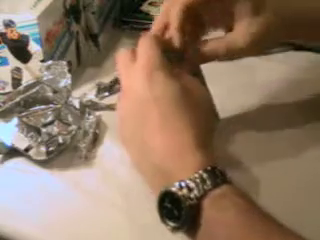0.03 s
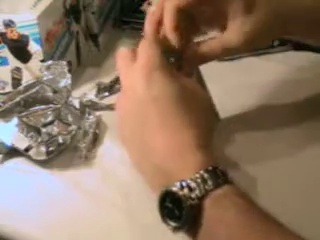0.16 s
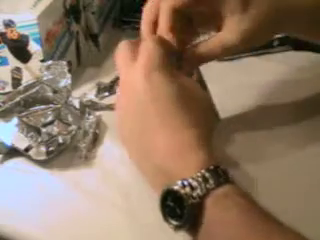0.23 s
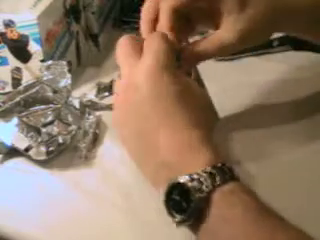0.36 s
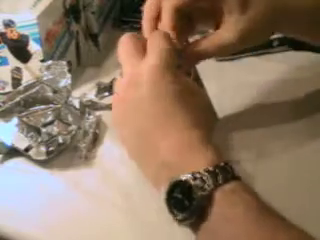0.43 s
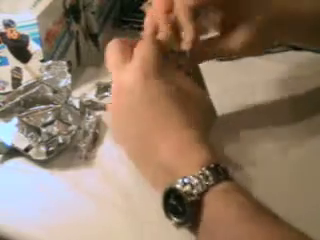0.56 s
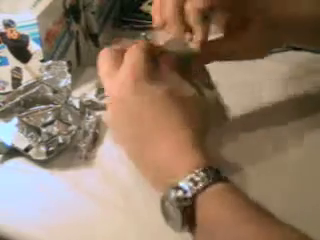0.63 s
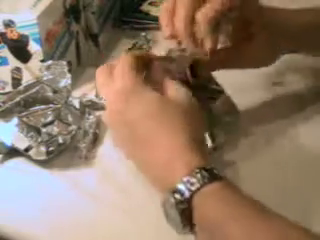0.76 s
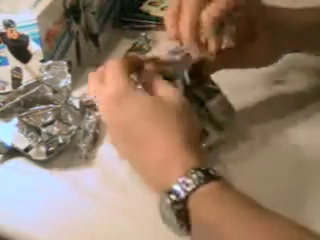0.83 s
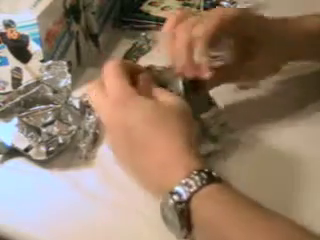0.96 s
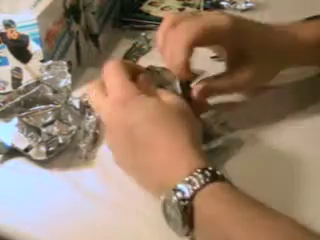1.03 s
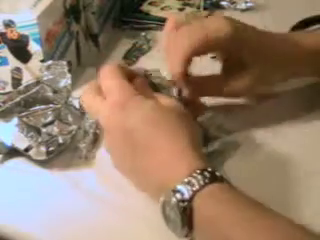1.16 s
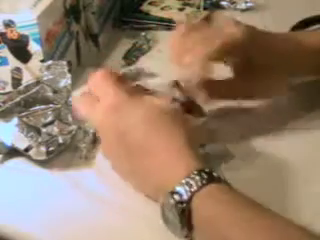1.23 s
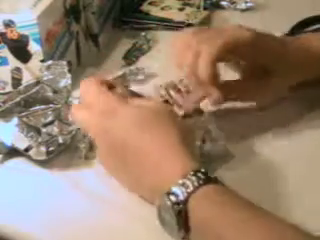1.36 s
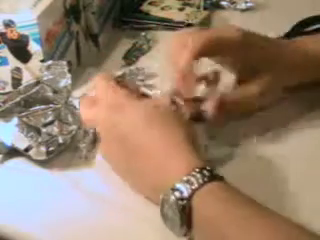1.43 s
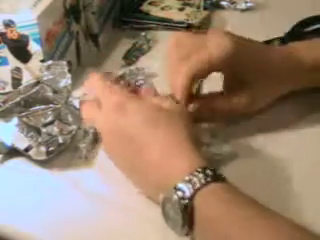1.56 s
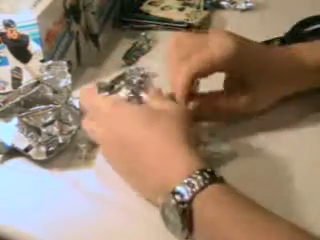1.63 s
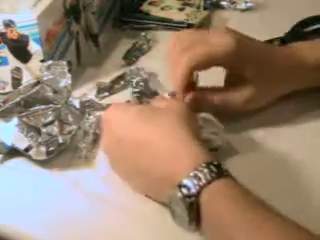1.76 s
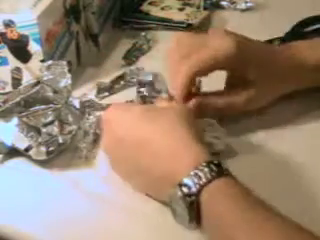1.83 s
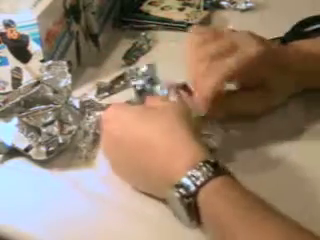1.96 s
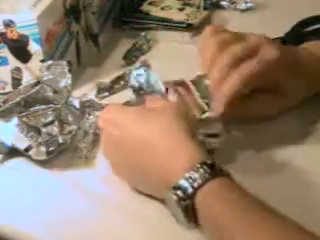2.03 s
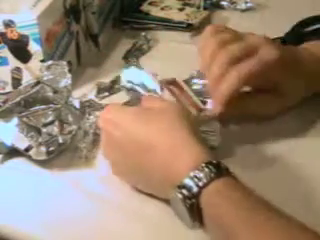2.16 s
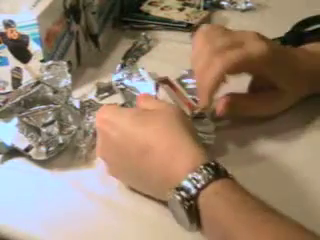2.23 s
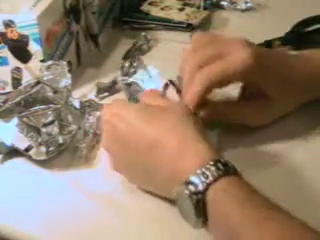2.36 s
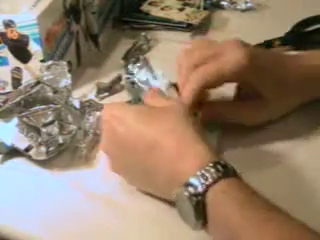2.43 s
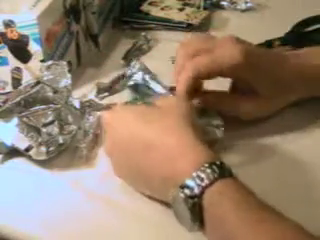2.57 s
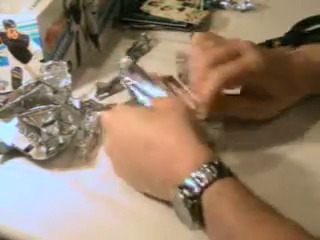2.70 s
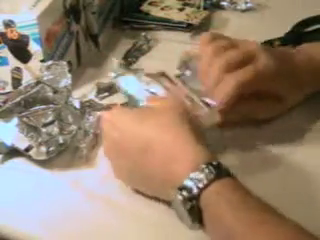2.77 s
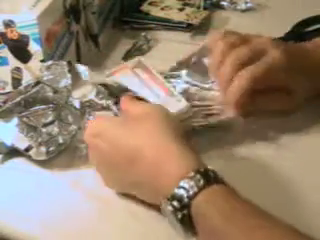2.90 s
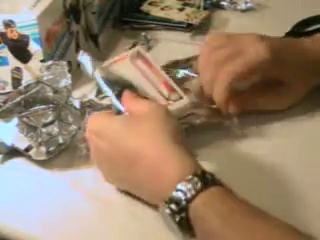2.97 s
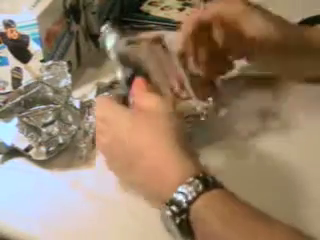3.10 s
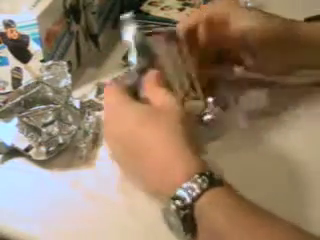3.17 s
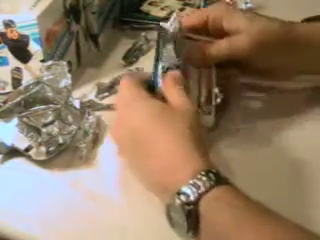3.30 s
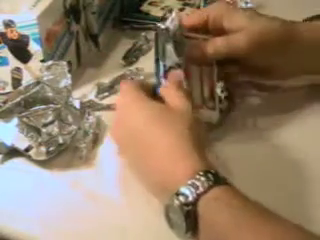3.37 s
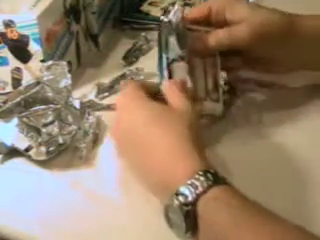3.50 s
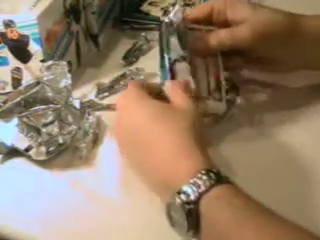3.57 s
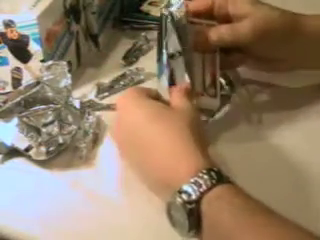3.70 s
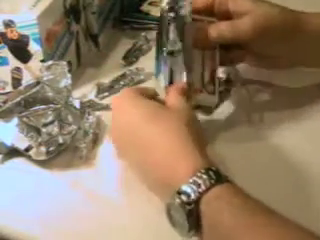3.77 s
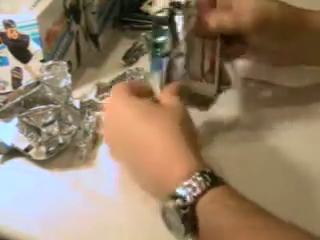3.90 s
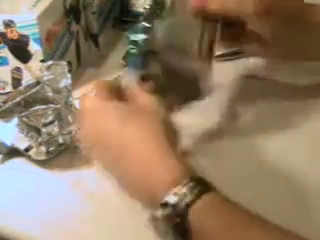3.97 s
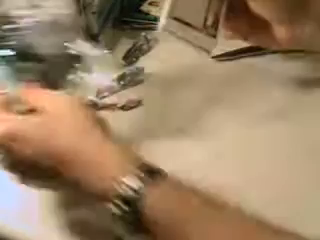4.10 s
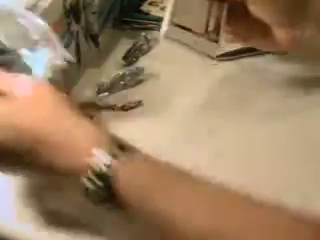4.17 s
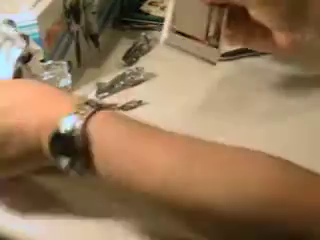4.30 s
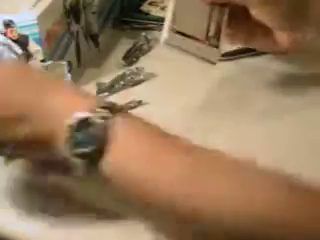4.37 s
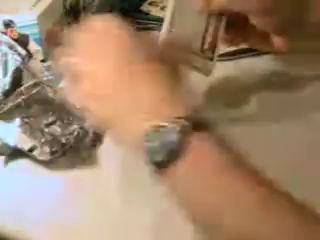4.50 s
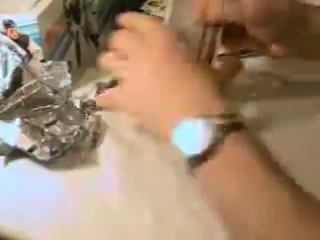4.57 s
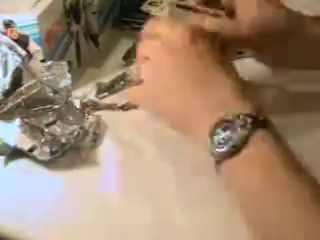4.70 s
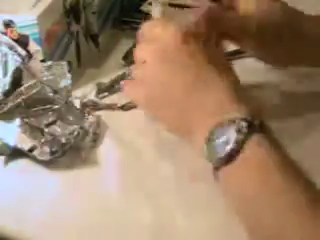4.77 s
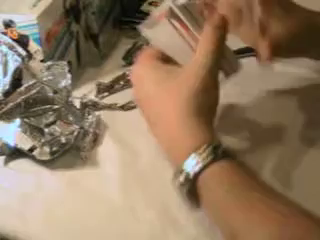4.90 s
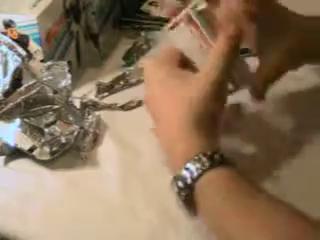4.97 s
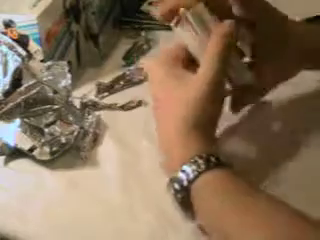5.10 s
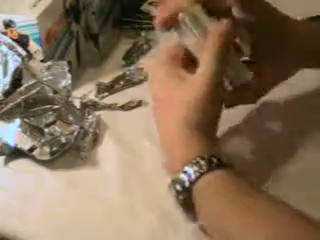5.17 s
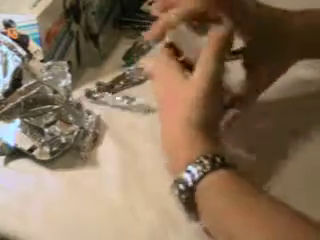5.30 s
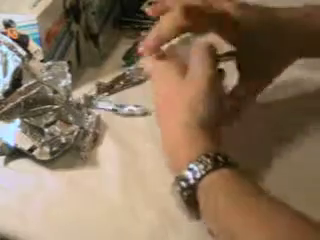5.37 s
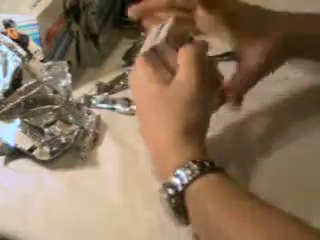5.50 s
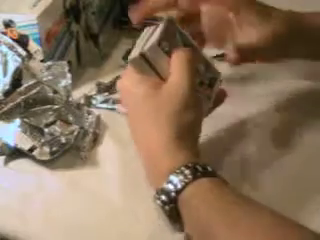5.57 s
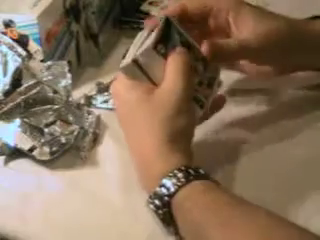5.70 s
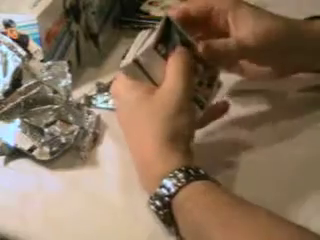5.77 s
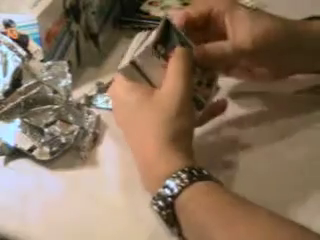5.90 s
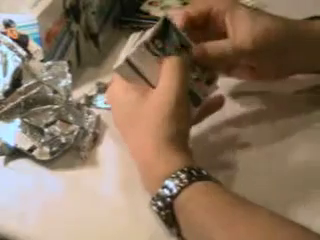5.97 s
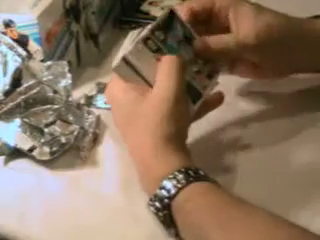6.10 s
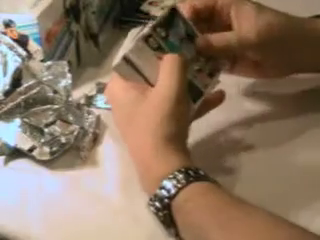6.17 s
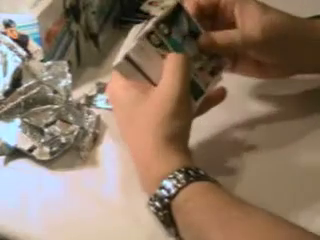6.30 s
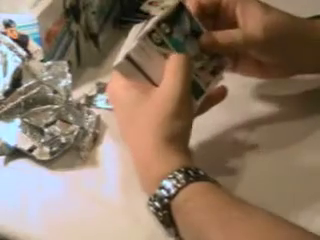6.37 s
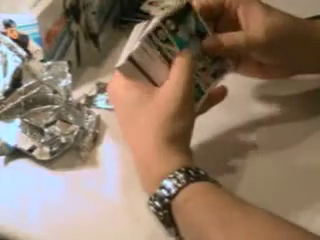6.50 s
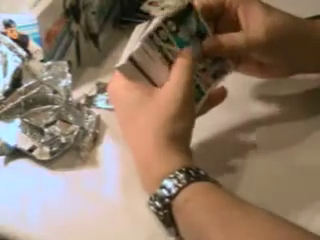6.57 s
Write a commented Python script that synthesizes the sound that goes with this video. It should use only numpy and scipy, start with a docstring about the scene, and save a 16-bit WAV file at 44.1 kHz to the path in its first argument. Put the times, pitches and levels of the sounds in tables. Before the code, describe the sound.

A foil wrapper crackles irregularly, faint at first, then much louder, with dry snaps and two short zipping tears before a last heavy crunch pops it open. Smaller crinkles and hollow low knocks follow until just past four seconds. The rest is nearly quiet: a few light cardboard ticks, grainy finger rubbing, soft room hiss with faint hum. Close, indoor pickup with a short room tail and dull top end.

```python
"""Two hands squeeze a foil pack on a table in a small room, over faint steady tones and soft room noise.
Creases snap as sharp ringing pulses over swarms of tiny crinkles; the seam rips in trains of quick slips.
Three hard pulls swell the crinkle; around the last, the pack pops open with one short pulse of air.
Bumps of the cardboard box, bursts of low resonant noise, run through the tearing until the foil dies down.
Then the box ticks and brushes against the fingers in grainy hiss, and two more high tones fade in late on."""
import sys
import numpy as np
from scipy import signal
from scipy.fft import rfft, irfft, next_fast_len
from scipy.io import wavfile
from scipy.ndimage import uniform_filter1d, map_coordinates

SR = 44100
rng = np.random.default_rng(int(sys.argv[2]) if len(sys.argv) > 2 else 0)


def bounce(signal):
    """Save signal as a 16-bit WAV file at the path given by the first command-line argument."""
    frames = np.transpose(np.atleast_2d(signal))
    limited = np.clip(frames, -1, 1)
    pcm = np.round(limited * 32767).astype(np.int16)
    wavfile.write(sys.argv[1], SR, pcm)


N = 292819
T = np.arange(N) / SR  # time [s]


def amp(db):
    """Decibels to gain."""
    return 10 ** (np.asarray(db) / 20)


def unit(x):
    """x at rms 1."""
    return x / np.sqrt(np.mean(x ** 2) + 1e-20)


def along(points, hz):
    """Read (frequency [Hz], value) points at hz, on a log frequency axis."""
    f, v = np.transpose(points)
    return np.interp(np.log(hz + 1), np.log(f + 1), v)


def filtered(x, response):
    """x shaped by a gain over frequency, without phase shift."""
    m = next_fast_len(N + SR // 2)
    return irfft(rfft(x, m) * response(np.fft.rfftfreq(m, 1 / SR)), m)[:N]


def coloured_noise(points):
    """Noise at rms 1 with a spectrum of (frequency [Hz], level [dB]) points."""
    return unit(filtered(rng.standard_normal(N), lambda f: amp(along(points, f))))


def pulse(gain, size=1024):
    """The minimum-phase pulse with this gain over frequency, made by folding its cepstrum."""
    hz = np.fft.rfftfreq(size, 1 / SR)
    cepstrum = irfft(np.log(np.maximum(gain(hz), 1e-6)))
    cepstrum[1:size // 2] *= 2
    cepstrum[size // 2 + 1:] = 0
    return irfft(np.exp(rfft(cepstrum)))


def hump(f, hz, spread, skirt=1.0):
    """A broad resonance around hz; spread in octaves, a higher skirt falls off faster far out."""
    return (1 + (np.log2((f + 1) / hz) / spread) ** 2 / (4 * skirt)) ** -skirt


def add(track, s, x):
    """Mix x into the track at time s."""
    part = track[max(round(s * SR), 0):][:len(x)]
    part += x[:len(part)]


def wobble(rate):
    """A smooth random curve with rate knots a second."""
    return map_coordinates(rng.standard_normal(N // 100), [T * rate], mode="wrap")


def swell(middle_s, length_s):
    """A smooth rise and fall, half a cosine cycle long."""
    return np.cos(np.pi * np.clip((T - middle_s) / length_s, -.5, .5))


def stroke_db(start_s, hold_s, rise, fall):
    """Attack, hold and release of one hand movement; rise and fall in dB per s."""
    attack = -rise * np.maximum(start_s - T, 0)
    release = -fall * np.maximum(T - start_s - hold_s, 0)
    return attack + release


def handling():
    """The powers of all hand movements add up; the strongest weighs most in the brightness."""
    # fingers squeezing the foil: (start [s], hold [s], crinkle level [dB], treble over body [dB])
    squeezes = [(0.0, .34, -56.5, 4), (0.534, 0.022, -46, -9.5), (0.621, .07, -44.5, 0),
                (0.768, .095, -43, -2.5), (0.996, 0.11, -49, 2), (1.109, 0.049, -42, -1),
                (1.189, .05, -39, 0.5), (1.392, 0.072, -45.5, -1), (1.529, .06, -40.5, 0.5),
                (1.705, 0.097, -50.5, 1), (1.843, 0.022, -43, 3.5), (1.94, 0.034, -42, -4.5),
                (2.254, 0.016, -41.5, -1.5), (2.34, .1, -46, -4.5), (2.458, 0.25, -42, -3),
                (2.686, .08, -37, -4), (2.975, .075, -43, 2), (3.157, 0.27, -54, -7),
                (3.692, 0.37, -52, -1.5), (3.963, 0.033, -40, 0), (4.176, .075, -56.5, -1.5),
                (4.346, 0.025, -47.5, -9)]
    # hard pulls that force the pack open:
    # (start [s], hold [s], crinkle level [dB], treble over body [dB], build-up [dB/s])
    pulls = [(1.281, 0.029, -27, 5.5, 597), (1.979, 0.032, -26, 14, 1296), (2.833, 0.026, -25.5, -1, 170.5)]
    # foil merely held, faintly crinkling: (start [s], hold [s], crinkle level [dB], treble over body [dB])
    holding = (0, 3.5, -60.5, -1.5)
    grip, settle = 1399, 231.5  # [dB/s] a squeeze takes hold at once; the foil then settles
    let_go = 254  # [dB/s] the strain drops once the foil has given way
    moves = [(*row, grip, settle) for row in [holding, *squeezes]]
    moves += [(*row, let_go) for row in pulls]
    power, bright = np.full(N, 1e-12), np.zeros(N)
    for s, hold_s, db, treble_db, rise, fall in moves:
        level_db = db + stroke_db(s, hold_s, rise, fall)
        share = amp(np.maximum(level_db, -200)) ** 2
        power += share
        bright += treble_db * share
    return 10 * np.log10(power), bright / power


def bass_cut(f, hz, corner=0.26):
    """A facet that rings at hz radiates little far below it."""
    return 1 / np.sqrt(1 + (corner * hz / (f + 1)) ** 4)


def facet_colour(f, hz, spread):
    """What the microphone takes in of one ringing facet: resonance, bass cut and soft treble."""
    # microphone response to the facets, falling steeply in the treble: (frequency [Hz], gain [dB])
    microphone = [(100, 14.5), (5000, 1), (6300, -1.5), (7500, -15), (8700, -35.5)]
    ring = hump(f, hz, spread, skirt=1.4)
    return ring * bass_cut(f, hz) * amp(along(microphone, f))


def buckle(gain, flutter, settle_s):
    """A facet flips over with one sharp pulse, then flutters for a few ms; energy 1, random sign."""
    flip = pulse(gain)
    t = T[:len(flip)]
    onset = 1 - np.exp(-(2 * t / settle_s) ** 2)
    shiver = rng.standard_normal(len(flip)) * np.exp(-t / settle_s) * onset
    after = signal.fftconvolve(flip, shiver)[:len(flip)]
    x = flip / np.linalg.norm(flip) + flutter * after / np.linalg.norm(after)
    return rng.choice([-1, 1]) * x / np.linalg.norm(x)


def snaps(rows, flutter, settle_s):
    """Facets buckle singly, big ones low and small ones high: (s, dB over 3 ms, Hz, octaves)."""
    out = np.zeros(N)
    span = np.sqrt(.003 * SR)  # turns energy 1 into rms 1 over 3 ms
    for s, db, hz, spread in rows:
        snap = buckle(lambda f: facet_colour(f, hz, spread), flutter, settle_s)
        add(out, s, amp(db) * span * snap)
    return out


def stray_creases(work_db, over_db=9, size_db=2.5, ceiling_db=-35, pitch_hz=2300, scatter=0.41, count=120):
    """Lesser creases give way at random moments, set against the work of the hands: (s, dB, Hz)."""
    moments = rng.integers(N, size=count)
    rows = []
    for at, (size, pitch) in zip(moments, rng.standard_normal((count, 2))):
        db = min(work_db[at] + over_db + size_db * size, ceiling_db)
        rows.append((T[at], db, pitch_hz * 2 ** (scatter * pitch)))
    return rows


def foil_snaps(work_db):
    """Loud and lesser creases of the foil give way; some ring clearly, some crack dryly."""
    # the loudest creases: (time [s], level over 3 ms [dB], pitch [Hz])
    loud_creases = [(0.0793, -45, 3850), (0.133, -39, 2990), (0.1939, -36, 2540), (0.2449, -32.5, 2140),
                    (0.3115, -38, 2150), (0.335, -35, 1770), (0.4566, -34.5, 1900), (0.5218, -31.5, 1420),
                    (0.607, -33.5, 1390), (0.6238, -30, 1700), (0.6474, -31, 2140), (0.6571, -27.5, 2500),
                    (0.6873, -30, 3170), (0.6979, -25, 3500), (0.771, -33.5, 1730), (0.8631, -21.5, 2470),
                    (0.9893, -34.5, 1237), (1.0504, -28, 1530), (1.1545, -32, 2450), (1.2521, -35, 2010),
                    (1.278, -28, 2820), (1.2981, -19, 1720), (1.4457, -32, 2240), (1.525, -30.5, 1780),
                    (1.5586, -25, 1298), (1.5685, -30.5, 1964), (1.7746, -36.5, 2590), (1.945, -32.5, 2970),
                    (1.9686, -28.5, 2560), (2.2585, -35, 1520), (2.3402, -32.5, 1940), (2.4499, -35, 1510),
                    (2.4821, -25.5, 1037), (2.5765, -30, 2424), (2.6058, -28, 1960), (2.6984, -22.5, 2390),
                    (2.7134, -26.5, 1620), (2.7661, -25, 1955), (2.7926, -15.5, 1580),
                    (2.8012, -23.5, 2170), (2.8448, -17, 2224), (2.872, -20.5, 1860), (3.0256, -35, 1540),
                    (3.2151, -45, 2900), (3.3908, -30, 1740), (3.4579, -36, 2110), (3.7389, -37, 1950),
                    (3.7773, -37.5, 3610), (3.8095, -29.5, 2160), (3.8216, -32, 2000), (3.8618, -38, 2030),
                    (3.9284, -31, 2300), (4.1738, -41, 2100), (4.2502, -39.5, 1290)]
    spread, spread_scatter = 0.4, 0.28  # width of the ring [octaves], its scatter [natural log]
    creases = [(*row, spread * np.exp(spread_scatter * rng.standard_normal()))
               for row in [*loud_creases, *stray_creases(work_db)]]
    return snaps(creases, flutter=.95, settle_s=.0013)


def crinkle(work_db, bright_db, rest_rate=270, rate_db=0.56, size_db=6.5, clump_db=-1.0, clump_rate=190,
            slide_db=-15, slack_db=12, pitch_hz=2200, scatter=0.55, spread=0.33, split_hz=2200, count=96):
    """Swarms of tiny creases: harder work makes them louder and denser."""
    # colour of the whole foil sheet: (frequency [Hz], relative level [dB per Hz])
    foil_colour = [(71, -48.5), (120, -35), (318, -6.5), (374, -9.5), (472, -2.5), (1040, 0.5), (1340, 2.5),
                   (2260, -3.5), (2810, -2), (5380, -9), (6920, -25), (8910, -56.5), (11600, -82),
                   (19600, -120)]
    rate = rest_rate * amp(rate_db * (work_db - np.median(work_db)))  # creases per s
    chance, sizes, facet = rng.random(N), rng.standard_normal(N), rng.integers(count, size=N)
    pitches = pitch_hz * 2 ** (scatter * rng.standard_normal(count))
    facets = [buckle(lambda f: hump(f, hz, spread), flutter=0.98, settle_s=0.0011) for hz in pitches]
    swarm = np.zeros(N)
    for i in np.flatnonzero(chance < rate / SR):
        add(swarm, T[i], amp(size_db * min(sizes[i], 2)) * facets[facet[i]])
    # under a firm grip one crease sets off its neighbours, in clumps of a few ms
    grip = np.clip(1 + (work_db - work_db.max()) / 40, 0, 1)
    swarm *= amp(2 * clump_db * grip * np.tanh(wobble(clump_rate)))
    # all facets together take on the colour of the whole sheet
    mean_gain = np.sqrt(np.mean(np.abs(rfft(np.array(facets))) ** 2, axis=0))
    sheet = pulse(lambda f: amp(along(foil_colour, f)) / mean_gain)
    swarm = unit(signal.fftconvolve(swarm, sheet)[:N])
    # under a light grip the layers also slide over each other, with a fine hiss
    swarm += amp(slide_db + slack_db * (1 - grip)) * coloured_noise(foil_colour)
    # taut foil is brighter than slack foil
    body = filtered(swarm, lambda f: 1 / (1 + (f / split_hz) ** 4))
    treble = swarm - body
    tilt = amp(bright_db / 2)
    swarm = unit(body / tilt + treble * tilt)
    # the creases share out the work of the hands: level evened over 1500 samples, gaps left quiet
    power = np.abs(uniform_filter1d(swarm ** 2, size=1500))
    return amp(work_db) * swarm / np.sqrt(power + 0.017)


def tears(slip_rate=650, jitter=0.38, size_db=3.5, count=80):
    """The tear advances in quick uneven slips; each one rings the taut strip of foil."""
    # rips along the seam: (middle [s], length [s], nominal level [dB], ring [Hz], spread [octaves])
    rips = [(0.828, 0.096, -40, 3100, 0.48), (1.28, 0.017, -26, 2620, 0.13),
            (1.304, 0.074, -32.5, 2010, 0.61), (1.992, 0.059, -27, 2990, 0.46),
            (2.022, 0.062, -29.5, 2410, 0.36)]
    out = np.zeros(N)
    for middle_s, length_s, db, hz, spread in rips:
        slips = np.zeros(N)
        gaps_s = np.exp(jitter * rng.standard_normal(count)) / slip_rate
        for s in middle_s - length_s / 2 + np.cumsum(gaps_s):
            slip = buckle(lambda f: facet_colour(f, hz, spread), flutter=0.3, settle_s=0.0022)
            add(slips, s, amp(size_db * rng.standard_normal()) * slip)
        density = np.sqrt(SR / slip_rate)  # brings the train of slips to about rms 1
        out += amp(db) * swell(middle_s, length_s) * slips * density
    return out


def puff(start_s=2.7925, db=-32, length_s=0.00069):
    """The pack pops open and pushes out one short puff of air: a one-sided pulse, db at its peak."""
    u = np.maximum(T - start_s, 0) / (length_s / 2)
    return amp(db) * u * np.exp(1 - u)


def box_ticks():
    """The cardboard box ticks in the fingers, each tick a small panel buckling."""
    # ticks: (time [s], level over 3 ms [dB], pitch [Hz], spread [octaves])
    tick_rows = [(4.5871, -39, 1110, 0.75), (4.735, -52, 2600, 0.56), (4.9157, -47, 2150, 0.55),
                 (5.183, -61, 4200, 0.4), (5.2691, -50, 2830, 0.74), (5.2769, -34.5, 1850, 0.95),
                 (5.528, -57, 4500, 0.5), (5.5682, -38.5, 2200, 0.17), (6.0166, -53, 1594, 0.35)]
    return snaps(tick_rows, flutter=.85, settle_s=.001)


def bumps(spread=0.38, rise_s=0.0016):
    """The hollow box answers soft contacts with a short low rumble."""
    # dull bumps of box and fingers: (time [s], level before rise and decay [dB], pitch [Hz], t60 [s])
    contacts = [(.573, -44.5, 430, 0.16), (1.194, -29, 480, 0.044), (1.293, -52, 426, 0.014),
                (1.446, -45.5, 224, 0.12), (1.559, -38, 380, 0.046), (2.262, -40.5, 462, 0.043),
                (2.705, -37, 390, 0.075), (2.832, -29, 414, 0.034), (2.897, -28, 437, 0.045),
                (3.822, -44, 288, 0.1), (4.006, -46.5, 280, 0.13), (4.349, -41, 298, 0.091),
                (4.367, -40, 597, 0.062)]
    out, t = np.zeros(N), T[:SR // 4]
    for s, db, hz, t60 in contacts:
        scuff = rng.standard_normal(len(t)) * amp(-60 * t / t60) * (1 - np.exp(-t / rise_s))
        cavity = pulse(lambda f: hump(f, hz, spread, skirt=2.9), size=4096)
        ring = signal.fftconvolve(scuff, cavity)
        add(out, s, amp(db) * ring * np.linalg.norm(scuff) / np.linalg.norm(ring))
    return out


def rubs(grip_db=3, grip_rate=45, grain_db=6):
    """Skin brushes over card: a fine grainy hiss that wavers with the grip."""
    # fingers sliding on the cardboard: (middle [s], length [s], level at the middle [dB])
    strokes = [(3.59, 0.9, -66), (4.727, 0.14, -61), (5.16, 0.4, -65.5), (5.471, 0.31, -63.5),
               (5.713, 0.22, -64), (6.529, 0.12, -66)]
    # colour of the rubbed cardboard: (frequency [Hz], relative level [dB per Hz])
    cardboard = [(150, 3), (600, 1.5), (2000, 0.5), (5000, -5.5), (7000, -24.5), (9000, -57)]
    grain_level_db = grain_db * rng.standard_normal(N) + grip_db * wobble(grip_rate)
    grains = rng.standard_normal(N) * amp(grain_level_db)
    hiss = unit(filtered(grains, lambda f: amp(along(cardboard, f))))
    return hiss * sum(amp(db) * swell(s, length_s) for s, length_s, db in strokes)


def room(x, near_db=-13, near_s=0.011, tail_db=-14):
    """Table and nearby things answer within some ms; the walls add a short tail."""
    # decay of the room tail: (frequency [Hz], t60 [s])
    decay = [(200, 0.8), (1500, 0.36), (7000, 0.22)]
    # noise that dies away faster in the treble
    hz, t, z = signal.stft(rng.standard_normal(SR // 2), SR, nperseg=256)
    tail = signal.istft(z * amp(-60 * t / along(decay, hz)[:, None]), SR, nperseg=256)[1]
    t = T[:len(tail)]
    tail *= 1 - np.exp(-(t / .004) ** 2)
    # sparse early echoes, some 900 a second from 2 ms on
    echoes = rng.standard_normal(len(t)) * (rng.random(len(t)) < 900 / SR)
    near = echoes * np.exp(-t / near_s) * (t > .002)
    answer = amp(near_db) * near / np.linalg.norm(near) + amp(tail_db) * tail / np.linalg.norm(tail)
    return signal.fftconvolve(x, answer)[:N]


def background(air_db=-63, waver=0.24):
    """Soft room noise, with a faint hum and thin high tones of slightly wavering phase (waver in rad)."""
    # colour of the room noise: (frequency [Hz], relative level [dB per Hz])
    air_colour = [(15, -51.5), (25, -20.5), (107, -14), (140, -13.5), (174, -18.5), (207, -11.5),
                  (365, -11.5), (433, -14.5), (1130, -22.5), (4940, -34.5), (8910, -65.5), (11600, -97),
                  (19600, -120)]
    # steady tones: (frequency [Hz], rms level [dB], start [s])
    tones = [(174, -69, 0), (1104, -79, 0), (5160, -84, 0), (6374, -96, 0), (4425, -85, 5.6),
             (4780, -85, 5.6)]
    out = amp(air_db) * coloured_noise(air_colour)
    for hz, db, s in tones:
        tone = unit(np.sin(2 * np.pi * hz * T + waver * wobble(11)))
        fade_in = np.clip((T - s) / .3, 0, 1) if s > 0 else 1
        out += amp(db) * tone * fade_in
    return out


def scene():
    """Foil and box on the table, in the room."""
    work_db, bright_db = handling()
    foil = foil_snaps(work_db) + crinkle(work_db, bright_db) + tears() + puff()
    box = box_ticks() + bumps() + rubs()
    pack = foil + box
    return (pack + room(pack) + background())[None]


def record(dry, top_hz=9080):
    """A steep band limit: nothing passes from top_hz upwards."""
    return filtered(dry[0], lambda f: f < top_hz)[None]


dry = scene()
out = record(dry)
bounce(out)
```